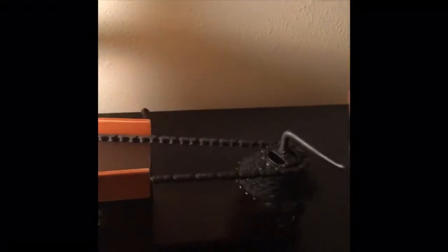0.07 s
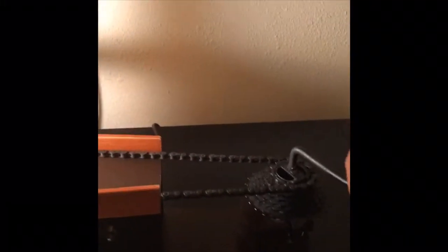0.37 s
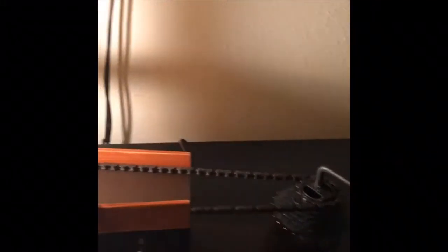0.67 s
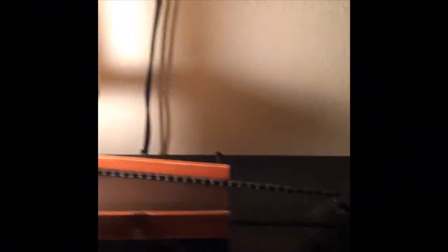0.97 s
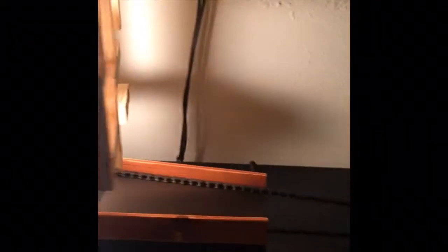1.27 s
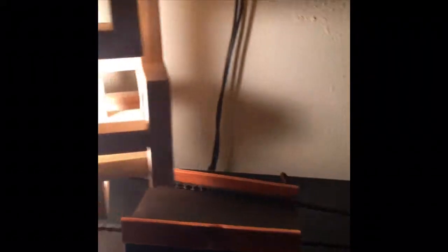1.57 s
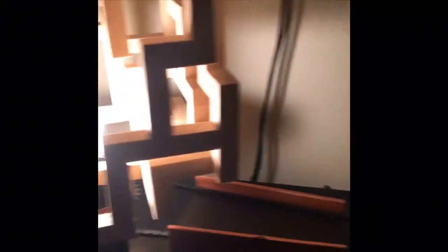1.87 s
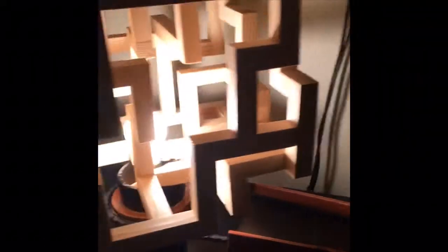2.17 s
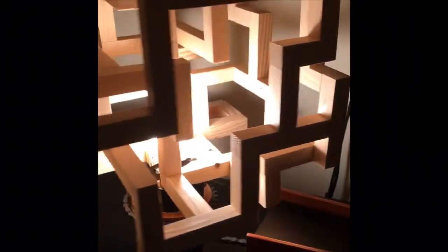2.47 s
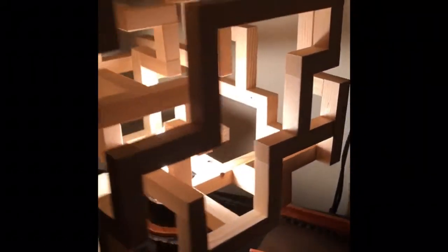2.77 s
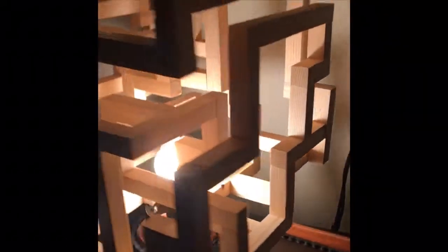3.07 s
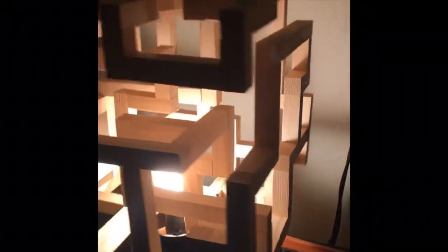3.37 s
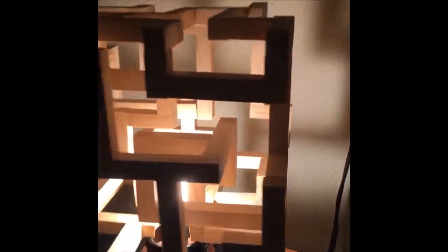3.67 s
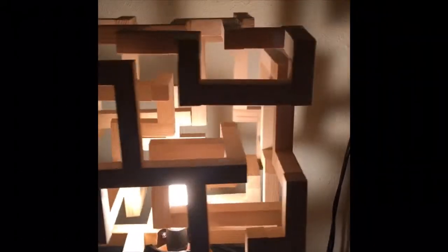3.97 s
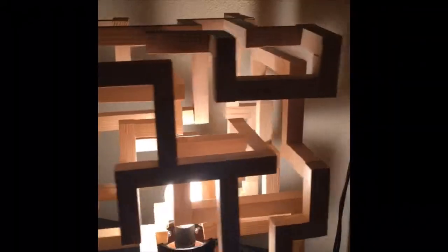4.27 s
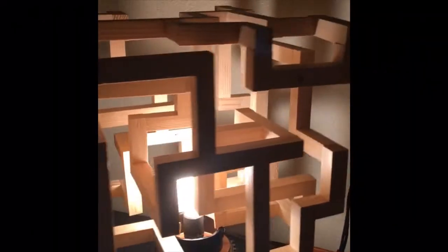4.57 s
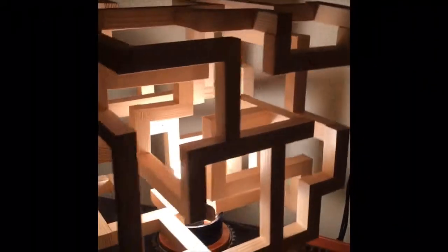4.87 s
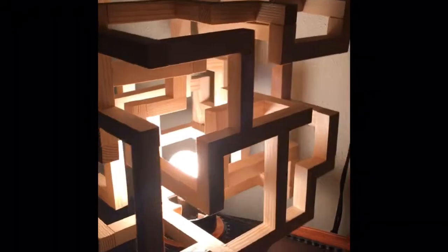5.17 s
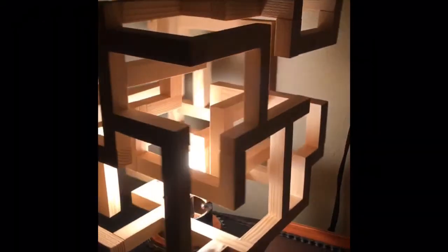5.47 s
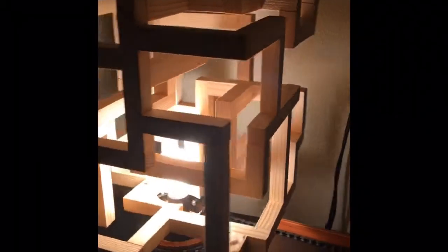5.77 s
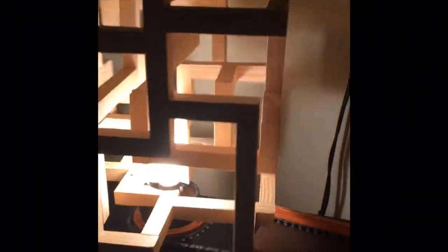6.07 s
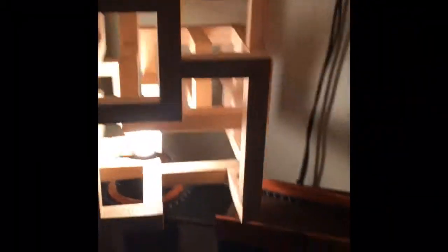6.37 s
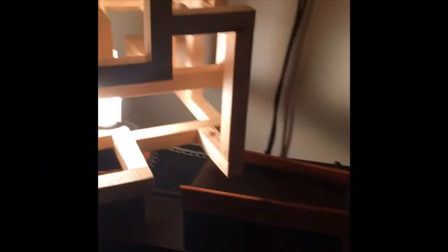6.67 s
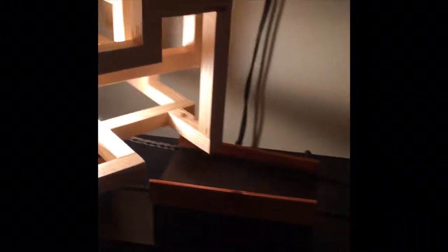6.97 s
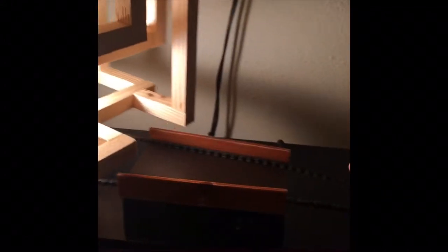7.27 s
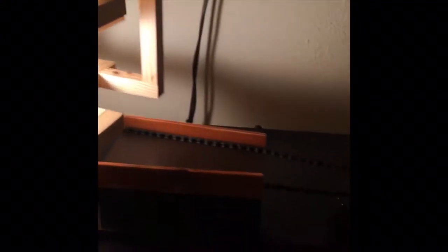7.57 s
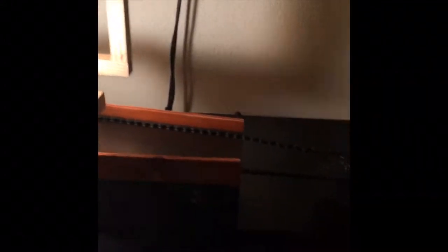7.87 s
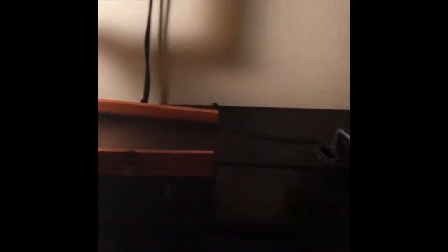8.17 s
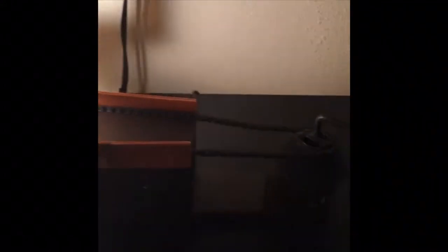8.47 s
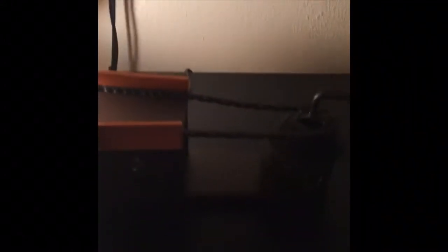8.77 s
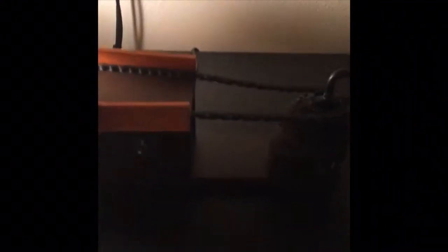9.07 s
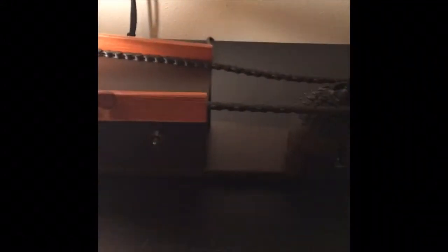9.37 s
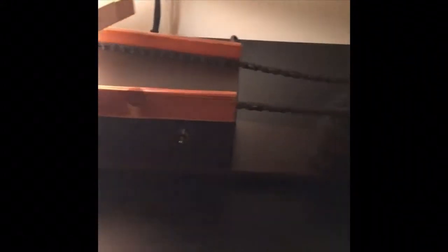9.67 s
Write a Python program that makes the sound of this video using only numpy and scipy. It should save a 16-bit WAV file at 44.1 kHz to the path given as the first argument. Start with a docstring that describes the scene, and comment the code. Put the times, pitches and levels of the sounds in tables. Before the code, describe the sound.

A hand crank knocks, then a ratchet clicks crisply and unevenly as a chain drive turns a wooden lamp in a quiet room.

```python
"""A few wooden knocks with a steely ring, then a run of crisp double clicks that hurries and slackens.
A hand crank knocks as it is gripped, then turns a wooden lamp by chain and gears. Two ratchet pawls
drop over every tooth; the wheel runs out of true, so their lag and colour come round with each turn.
The chain ticks and hisses, the gears rumble faintly through the table top, and the small, quiet room
rings briefly after each click."""
import sys
import numpy as np
from scipy import signal
from scipy.fft import rfft, irfft, next_fast_len
from scipy.io import wavfile
from scipy.ndimage import uniform_filter1d

SR = 44100
rng = np.random.default_rng(int(sys.argv[2]) if len(sys.argv) > 2 else 0)


def dump_mix(stems):
    """Bounce the given channels to the path in sys.argv[1] as a 16-bit WAV at rate SR."""
    frames = np.atleast_2d(stems).T  # one column per channel
    limited = np.clip(frames, -1, 1)  # hard clip at full scale
    pcm = np.round(limited * 32767).astype(np.int16)
    wavfile.write(sys.argv[1], SR, pcm)


N = 437913
AGE = np.arange(SR // 3) / SR  # seconds since a blow
WHEEL_TEETH = 20


def ratchet():
    """Two pawls, set slightly apart, fall in turn; their lag and colour come round with the wheel."""
    # first pawl dropping over each tooth: t/s, level/dB
    drops = [(0.7614, -29.0), (1.072, -29), (1.359, -29.5), (1.6449, -28.5), (1.8937, -29), (2.1255, -27.5),
             (2.372, -28.5), (2.552, -27.5), (2.7047, -27.5), (2.85, -28), (2.99, -28.5), (3.1275, -27.5),
             (3.2718, -29), (3.43, -28.5), (3.604, -29.5), (3.7917, -29.5), (3.9802, -30), (4.1893, -28.5),
             (4.3919, -29), (4.5829, -30.5), (4.774, -29.5), (4.9773, -29.5), (5.1934, -30.0),
             (5.4126, -28.5), (5.5753, -29.0), (5.7168, -28.0), (5.8654, -29.5), (6.024, -29), (6.174, -29),
             (6.3142, -30), (6.4654, -29.5), (6.6365, -30.0), (6.8219, -29.5), (7.005, -30), (7.1698, -29),
             (7.3193, -29), (7.4774, -29.5), (7.659, -28.0), (7.88, -29.5), (8.1428, -29.5), (8.3713, -29),
             (8.5786, -29.5), (8.7845, -28.5), (9.0177, -28), (9.2743, -29), (9.483, -27.5),
             (9.6731, -27.5), (9.8711, -27.0)]
    # second pawl's lag around the untrue wheel: tooth number, share of the time a tooth takes
    lag_shares = [(0, .128), (3, .095), (6, .062), (8, .034), (11, .024), (14, .02), (16, .064), (19, .082)]
    # colour of each pawl's snap: f/Hz, level/dB
    first_snap = [(300, -4), (800, -10.5), (1400, -3), (2100, 0), (2700, -7.5), (4600, 1.5), (5700, -3.5),
                  (6700, 0.5), (8700, 5), (10600, -2), (12200, 2.5), (15000, 2)]
    second_snap = [(300, -7.5), (800, -9.5), (1400, -5.5), (2600, -3), (4200, 3.5), (5700, -3), (6700, -1),
                   (9400, 0.5), (10500, -3), (12500, -2.5), (15000, 2.5)]
    tooth_s = np.gradient(np.transpose(drops)[0])
    out = np.zeros(N)
    for k, (s, db) in enumerate(drops):
        tooth = k % WHEEL_TEETH
        lag_s = tooth_s[k] * np.interp(tooth, *np.transpose(lag_shares))
        tone = wheel_tone(tooth)
        first = pawl(first_snap, tone, ring_db=-3, snap_t60=0.018, chatter_db=-5)
        second = pawl(second_snap, tone, ring_db=-2, snap_t60=0.02, chatter_db=-6)
        add(out, s, amp(db) * room(first, wet_db=-4))
        add(out, s + lag_s, amp(db - 2.5) * room(second, wet_db=-5))
    return out


def pawl(snap, tone, ring_db, snap_t60, chatter_db):
    """A pawl hits the next tooth: a sharp snap, a little chatter, and the housing rings."""
    # modes of the ratchet housing: f/Hz, level/dB, t60/s
    housing_modes = [(1518, -13.5, 0.049), (1896, -21, 0.078), (3336, -15, 0.038), (3803, -20, 0.23),
                     (3943, -8, 0.029), (4354, -3.5, 0.029), (6413, -4, 0.019), (6808, 0, 0.019),
                     (8640, -2.5, 0.012), (9440, -0.5, 0.01), (12020, -0.5, 0.011)]
    uneven = [(hz, db + 1.2 * rng.standard_normal()) for hz, db in snap]  # no two teeth are alike
    crack = colour(burst(snap_t60) + amp(chatter_db) * burst(0.056), uneven)
    housing = ring(housing_modes, scatter_db=2.5, detune=0.016)
    click = attack(0.00034) * (punch(crack) + amp(ring_db) * punch(housing))
    return colour(punch(click), tone)


def wheel_tone(tooth):
    """EQ of the click at this tooth, against the average of a whole turn: f/Hz, level/dB points."""
    # stretches of the wheel that lift or damp one register:
    # centre/tooth, spread/teeth, f/Hz, width/octaves, level/dB
    stretches = [(0, 1.1, 11600, 0.27, 3), (3.5, 1.4, 1500, 0.69, 3.5), (5.5, 1.2, 6550, 0.12, 4.5),
                 (14.5, 3.4, 4150, 0.25, 5), (16, 2.5, 6100, 0.27, -2.5), (14.5, 2.7, 1980, .45, 7.5),
                 (15, 3.2, 12500, 0.57, -2)]
    hz = np.geomspace(300, 16000, 48)
    gain_db = 0
    for centre, spread, centre_hz, octaves, db in stretches:
        teeth_away = (np.arange(WHEEL_TEETH) - centre + WHEEL_TEETH / 2) % WHEEL_TEETH - WHEEL_TEETH / 2
        near = np.exp(-(teeth_away / spread) ** 2)
        bell = np.exp(-(np.log2(hz / centre_hz) / octaves) ** 2)
        gain_db = gain_db + db * (near[tooth] - near.mean()) * bell
    return np.column_stack([hz, gain_db])


def knocks():
    """Each knock of the crank clacks in the frame, rings the steel handle and thumps the table."""
    # knocks: t/s, clack level/dB, clack roll-off/Hz, steel level/dB,
    # thump level/dB, thump centre/Hz, thump delay/s
    hits = [(0.2557, -32, 7000, -36.5, -26, 169, 0.0014), (0.464, -51.5, 3400, -51.5, -37.5, 259, 0.00091),
            (0.5604, -46.5, 3150, -66, -54, 253, 0.0011), (0.8746, -24, 5200, -64, -33, 99, 0.0083)]
    # colour of the wooden clack: f/Hz, level/dB
    clack_eq = [(150, -6), (650, -3.5), (1150, 4), (2000, 5), (2800, -4.5), (4600, 5.5), (7000, -0.5),
                (10000, -3), (15000, -9)]
    # modes of the wooden frame and the steel handle: f/Hz, level/dB, t60/s
    frame_modes = [(1090, 10, 0.049), (1430, -12, .09), (1740, 4.5, 0.14), (1886, 2.5, 0.2),
                   (3710, -10, 0.074), (4350, -17, 0.064)]
    handle_modes = [(2186, -3, 0.27), (2240, -5.5, 0.32), (2530, -8, 0.14), (3460, 0.5, 0.08),
                    (3610, -13, 0.37), (4870, -14, 0.15), (10570, -22, .2), (10800, -14, 0.19)]
    out = np.zeros(N)
    for s, clack_db, dull_hz, steel_db, thump_db, thump_hz, delay in hits:
        clack = punch(colour(burst(0.044), clack_eq))
        frame = punch(ring(frame_modes, scatter_db=-0.5, detune=0.0044))
        wood = attack(0.00039) * (clack + amp(-9.5) * frame)
        wood = colour(wood, [(dull_hz, 0), (2 * dull_hz, -9)])
        steel = ring(handle_modes, scatter_db=1, detune=0.001)
        add(out, s, room(amp(clack_db) * punch(wood), wet_db=-6))
        add(out, s, room(amp(steel_db) * punch(steel), wet_db=-3))
        add(out, s + delay, amp(thump_db) * thump(thump_hz))
    return out


def thump(centre_hz):
    """A short push drives the table top's modes near centre_hz; they die fast and the room booms on."""
    # modes of the table top: f/Hz, level/dB, t60/s
    top_modes = [(99.3, 2, 0.081), (122, -0.5, 0.087), (205.6, 4, 0.069), (246, -11, 0.14),
                 (351, -15.5, .1), (421, -5.5, 0.13)]
    since_release = np.maximum(AGE - 0.032, 0)
    top = 0
    for hz, db, t60 in top_modes:
        gain = amp(db - 2.7 * abs(np.log2(hz / centre_hz)))
        swell = 1 - np.exp(-(AGE * hz / 1.04) ** 2)  # a mode builds over cycles, so the lows come late
        decay = np.exp(-np.log(1000) * since_release / t60)
        top = top + gain * swell * decay * np.sin(2 * np.pi * (hz * AGE + rng.random()))
    boom_eq = [(40, -14), (100, 3), (220, -6.5), (420, -12), (700, -31.5), (3000, -60)]
    boom = colour(burst(0.28) * attack(0.02), boom_eq)
    return punch(top, window=900) + amp(-9) * punch(boom, window=900)


def chain_ticks():
    """Now and then a link seats itself with a dull tick."""
    # links settling on the sprocket: t/s, level/dB, f/Hz
    links = [(0.239, -51.5, 1380), (1.874, -53, 1510), (6.255, -49.5, 1280), (6.687, -45.5, 1850),
             (6.9923, -38, 1600), (7.956, -52.5, 1290), (8.348, -53, 1100)]
    out = np.zeros(N)
    for s, db, hz in links:
        tick_eq = [(hz / 2, -20), (hz / 1.3, -2), (hz, 0), (hz * 1.38, -12), (hz * 2, -17), (hz * 5, -32)]
        tick = colour(burst(0.027) * attack(0.0027), tick_eq)
        add(out, s, room(amp(db) * punch(tick), wet_db=-6))
    return out


def chain_hiss():
    """The chain rubs along its guide with a fine hiss that comes and goes."""
    # colour of the rubbing: f/Hz, level/dB
    hiss_eq = [(700, -20), (1600, -6), (4000, 0), (8000, -2), (15000, -7)]
    # swells of the rubbing: t/s, level/dB
    swells = [(1.04, -98), (1.16, -63), (3.1, -65.5), (3.7, -76), (5.35, -90), (5.6, -64), (7.45, -66),
              (7.83, -82), (8, -63), (9.9, -66.5)]
    return fader(swells) * noise_bed(hiss_eq)


def gear_rumble():
    """Chain and gears take up the load, then roll under the lamp and shake the table top."""
    # colour of the rumble: f/Hz, level/dB
    rumble_eq = [(25, -32), (45, -10), (65, -1.5), (105, 3.5), (130, 5), (165, -15.5), (205, -3), (250, -5),
                 (310, -21.5), (380, -14), (520, -23.5), (1000, -23), (2000, -28), (6000, -39.5),
                 (15000, -49)]
    # the rumble swells and eases with the load: t/s, level/dB
    swells = [(.15, -64.5), (1.05, -53), (1.7, -54.5), (2.08, -49), (2.33, -56), (2.63, -46.5), (3.7, -54),
              (5.0, -50.5), (5.3, -51.5), (6.25, -46), (6.8, -50.5), (7.4, -49), (7.83, -55.5), (8.38, -50),
              (8.58, -52), (8.82, -48.5), (9.1, -53.5), (9.6, -49.5)]
    return fader(swells) * noise_bed(rumble_eq)


def room(x, wet_db):
    """A blow plus its diffuse echo: it arrives from all sides, so narrow peaks blur; the mids linger."""
    # decay of the echo: f/Hz, t60/s
    decay_times = [(500, 0.22), (1500, .5), (4000, 0.44), (8000, 0.4), (15000, 0.25)]
    # colour of the echo: f/Hz, level/dB
    echo_eq = [(100, -4), (500, 2), (1700, 1), (4000, -2.5), (8000, -2.5), (15000, -1)]
    n = len(AGE)
    hz = np.arange(n // 2 + 1) * SR / n
    blurred = np.sqrt(abs(uniform_filter1d(abs(rfft(x, n)) ** 2, size=64)))
    spectrum = rfft(rng.standard_normal(n)) * blurred * amp(lookup(echo_eq, hz))
    octave = np.log2(np.clip(hz, 500, 16000) / 500)
    build = 1 - np.exp(-(AGE / 0.006) ** 2)
    tail = np.zeros(n)
    for k in range(6):
        band = irfft(spectrum * np.maximum(1 - abs(octave - k), 0), n)
        tail += band * fade(lookup(decay_times, 500 * 2 ** k))
    treble_energy = np.sum((build * fade(lookup(decay_times, 8330))) ** 2)
    return x + amp(wet_db) * build * tail / np.sqrt(treble_energy)


def room_tone():
    """Still air: a low, steady hush."""
    # colour of the hush: f/Hz, level/dB
    air_eq = [(25, -12), (45, 0.5), (110, 0.5), (165, -7.5), (230, -2), (360, -7.5), (520, -21), (900, -26),
              (3000, -35), (15000, -39.5)]
    return amp(-58) * noise_bed(air_eq)


def amp(db):
    """Decibels to gain."""
    return 10 ** (np.asarray(db) / 20)


def fader(points):
    """Gain ride through t/s, level/dB points."""
    return amp(np.interp(np.arange(N) / SR, *np.transpose(points)))


def noise_bed(eq):
    """Steady coloured noise at rms 1."""
    noise = colour(rng.standard_normal(N), eq)
    return noise / np.sqrt(np.mean(noise ** 2))


def punch(x, window=130):
    """Scale a blow so that its loudest window of samples has rms 1."""
    return x / np.sqrt(uniform_filter1d(x ** 2, window).max())


def lookup(points, hz):
    """Read f/Hz, value points on a log-frequency axis."""
    f, value = np.transpose(points)
    return np.interp(np.log(np.maximum(hz, 1)), np.log(f), value)


def colour(x, eq):
    """Minimum-phase EQ through f/Hz, level/dB points: nothing rings ahead of a hit."""
    n = next_fast_len(len(x) + 2048, True)
    hz = np.arange(n // 2 + 1) * SR / n
    cepstrum = irfft(np.log(amp(lookup(eq, hz))), n)
    cepstrum[1:n // 2] *= 2
    cepstrum[n // 2 + 1:] = 0
    return irfft(rfft(x, n) * np.exp(rfft(cepstrum)), n)[:len(x)]


def attack(rise_s):
    """Rounded onset of a blow."""
    return 1 - np.exp(-AGE / rise_s)


def fade(t60):
    """Exponential decay after a blow."""
    return np.exp(-np.log(1000) * AGE / t60)


def burst(t60):
    """Dying noise: a crowd of short, dense resonances."""
    return rng.standard_normal(len(AGE)) * fade(t60)


def ring(modes, scatter_db, detune):
    """Decaying modes; every blow lands a little differently."""
    out = 0
    for hz, db, t60 in modes:
        level_jitter, pitch_jitter, phase = rng.standard_normal(3)
        partial = np.sin(2 * np.pi * (hz * (1 + detune * pitch_jitter) * AGE + phase))
        out = out + amp(db + scatter_db * level_jitter) * fade(t60) * partial
    return out


def add(out, s, x):
    """Mix x into out at time s."""
    i = int(s * SR)
    out[i:i + len(x)] += x[:max(N - i, 0)]


def scene():
    """The cranked drive over the room tone, in mono."""
    air = room_tone()
    return (ratchet() + knocks() + chain_ticks() + chain_hiss() + gear_rumble() + air)[None]


def record(dry):
    """The microphone cuts the very top."""
    top_hz = 15250
    return signal.sosfilt(signal.ellip(10, 0.2, 70, top_hz, fs=SR, output="sos"), dry)


dry = scene()
out = record(dry)
dump_mix(out)
```